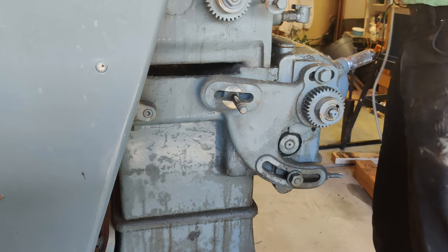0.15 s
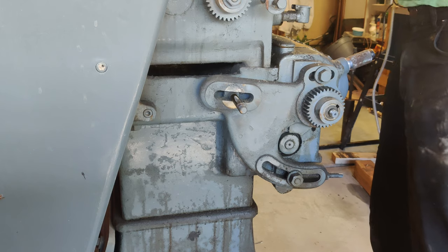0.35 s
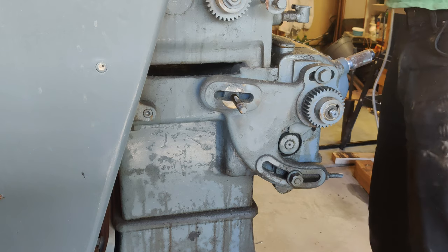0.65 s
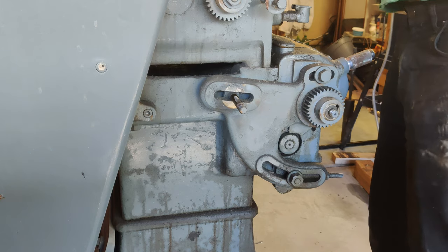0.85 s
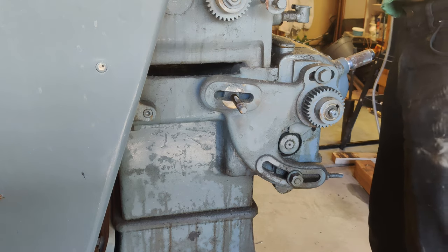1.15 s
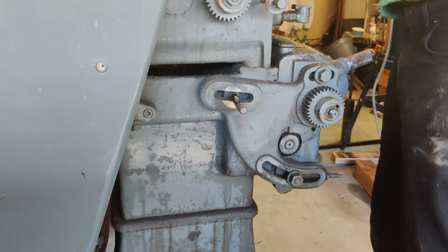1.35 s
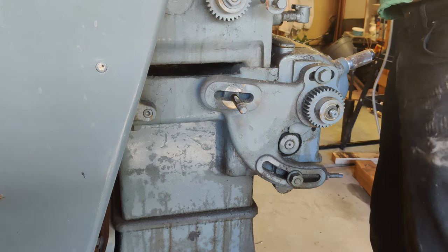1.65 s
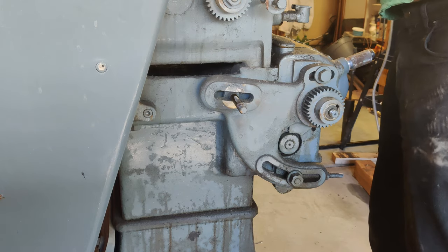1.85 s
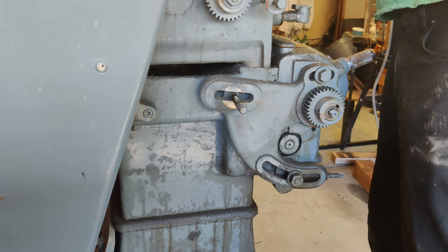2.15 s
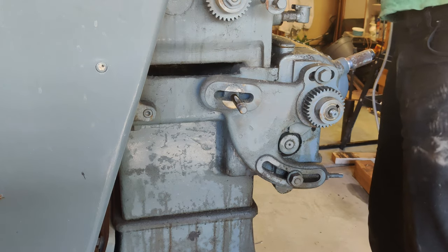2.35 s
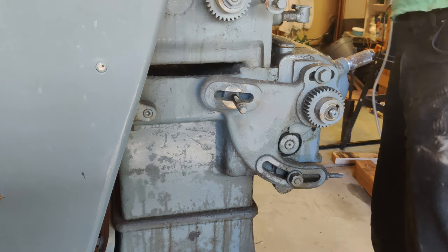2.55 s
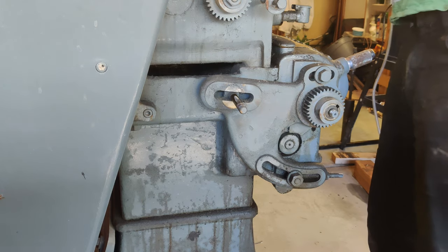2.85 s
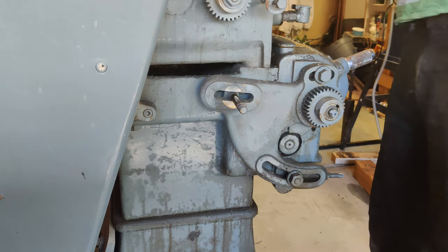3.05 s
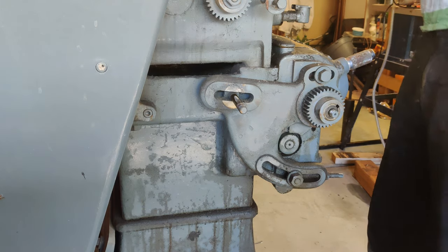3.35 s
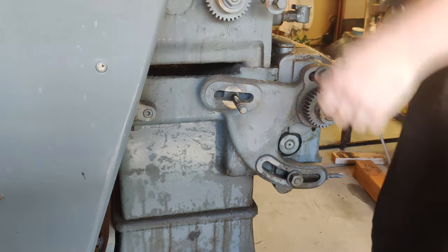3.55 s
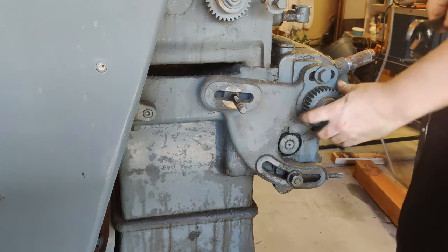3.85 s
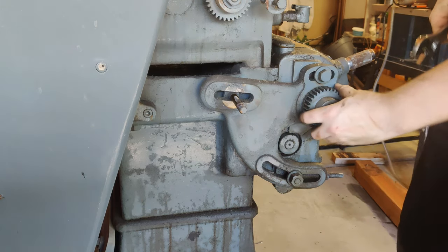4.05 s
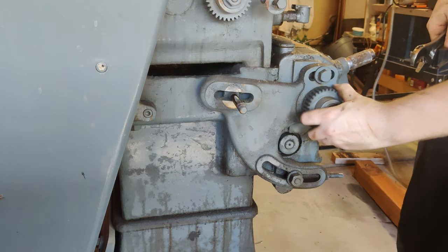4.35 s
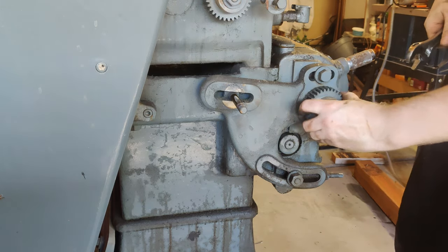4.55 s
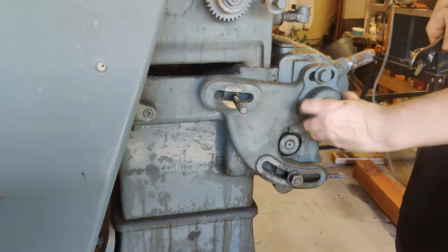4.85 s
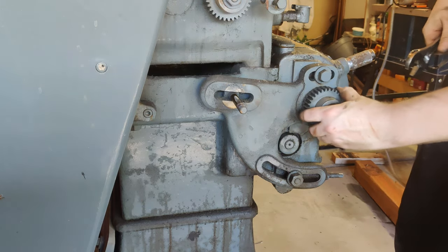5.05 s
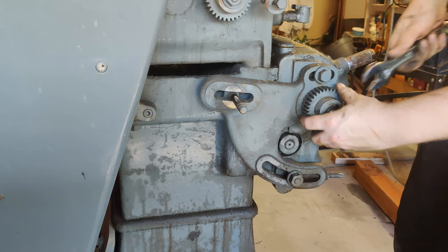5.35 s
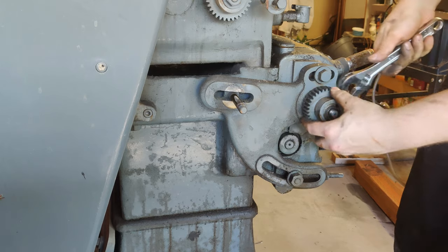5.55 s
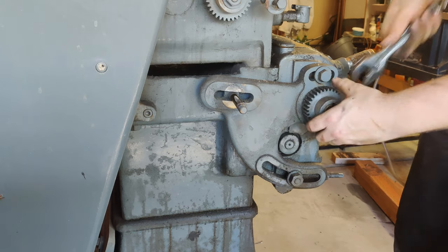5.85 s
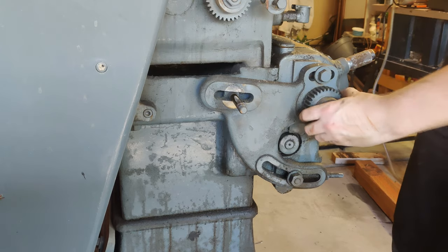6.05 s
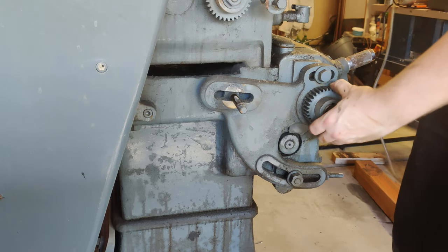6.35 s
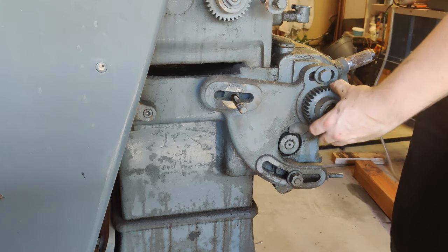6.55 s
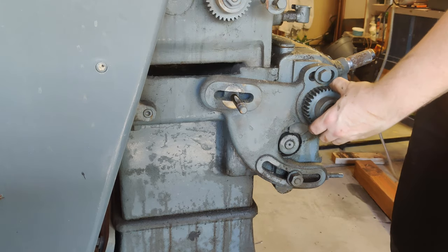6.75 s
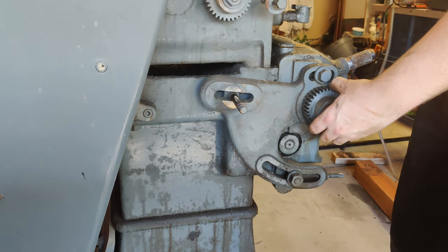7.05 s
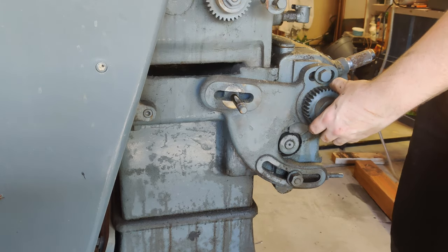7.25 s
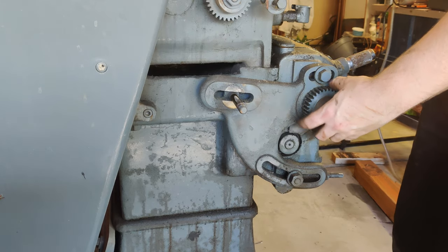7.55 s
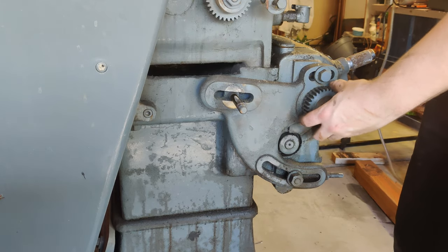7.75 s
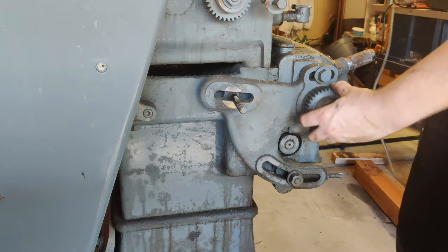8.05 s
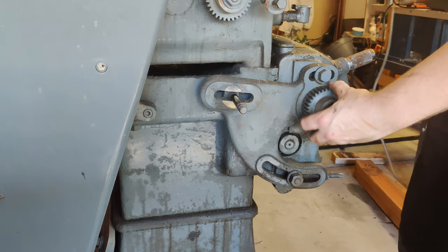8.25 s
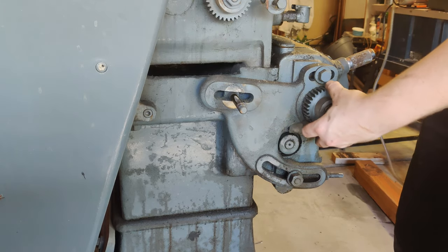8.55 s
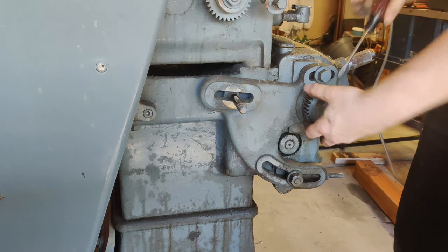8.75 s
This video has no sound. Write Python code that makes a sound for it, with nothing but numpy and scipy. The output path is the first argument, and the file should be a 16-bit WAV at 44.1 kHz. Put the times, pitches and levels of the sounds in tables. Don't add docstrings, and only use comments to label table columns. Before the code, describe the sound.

In a quiet hard-walled workshop, tools click off to the side, a gear is softly rocked, then a spanner rings loudly and metal clatters.

```python
import sys
import numpy as np
from scipy import signal
from scipy.fft import rfft, irfft
from scipy.io import wavfile
from scipy.ndimage import uniform_filter1d

SR = 44100
rng = np.random.default_rng(int(sys.argv[2]) if len(sys.argv) > 2 else 0)


def elevation(decibels):
    levels = np.asarray(decibels, float)
    return 10 ** (levels / 20)


def dump_mix(stems):
    frames = np.atleast_2d(stems).T
    limited = np.clip(frames, -1, 1)
    pcm = np.round(limited * 32767).astype(np.int16)
    wavfile.write(sys.argv[1], SR, pcm)


N = 391811

# [f/Hz,
# level/dB]
BACKGROUND_SWAY = [(0.0, -44.5), (0.05, -47.5), (0.34, -46.5), (0.57, -46.5), (2.27, -49.5), (3.04, -46),
                   (5.09, -44.5), (5.22, -47), (6.08, -47.5), (6.3, -48.5), (6.4, -43), (6.85, -46.5),
                   (7.0, -42.5), (7.42, -44.5), (7.49, -45.5), (8.16, -48), (8.83, -49), (8.88, -48)]
MACHINE_TONES = [(28.3, -4.5), (59.1, 1), (113, -21), (118.5, -17.5), (175, -24.5), (226, -20),
                 (257, -21.5)]
# [f/Hz, level/dB per Hz]
AIR_COLOUR = [(5.9, -26.5), (10, -5), (42, -8), (65, -4), (85, -15.5), (108, -22), (153, -13.5), (235, -13),
              (308, -22.5), (371, -18), (785, -29.5), (946, -26), (1140, -32), (6000, -46.5), (7800, -90),
              (13200, -120)]
AIR_DB = -54.5
HISS_COLOUR = [(3000, -71.5), (6000, -46), (9000, -46.5), (12000, -43.5), (15800, -39)]
# [f/Hz, level/dB]
PORT_LIKENESS = [(60, 1), (180, 0.95), (550, 0.45), (1650, 0.057), (4970, 0.064), (15000, -0.0)]
PORT_LEAN = [(60, 8), (180, -2), (550, 1), (1650, 2), (4970, -2.5), (15000, 3.5)]
# [t/s, level/dB]
WALL_DECAY = [(200, 0.82), (1000, 0.48), (2500, 0.65), (5000, 0.51), (8000, 0.46), (11000, 0.42),
              (15000, 0.15)]
NEAR_ECHOES = [(.006, -14), (.011, -13), (.017, -13), (.021, -16)]

CLOCK_BEATS = [0, 3, 13, 16, 19, 25, 27, 31, 39, 51, 55, 60, 67, 75, 94, 100, 104, 107]
STRAY_TICKS = [.2114, .7018, 1.1672, 1.5554, 1.6192, 1.6881, 1.8447, 4.0746, 4.6203, 5.8356, 6.212, 6.6204,
               7.5068, 7.621, 7.836, 8.676]
CLOCK_START_S, CLOCK_PERIOD_S = .0638, .08
CLOCK_DB, STRAY_DB, TICK_SPREAD_DB = -65, -64, 1.8

# [peak t/s, rise t/s, fall t/s, level/dB, brightness/dB per octave]
RUSTLE_STROKES = [
    (3.33, 0.005, 0.051, -65, 12),
    (3.406, 0.05, 0.039, -58.5, 3),
    (3.556, 0.7, .2, -66, 1.7),
    (3.828, 0.21, 0.11, -55.5, 6),
    (4.218, .18, 0.22, -72.5, -0.3),
    (4.7, .6, .6, -82.5, -1.5),
    (5.3, 0.03, .15, -87, -5),
    (8.135, .02, .012, -71, -1),
    (8.35, .25, 0.78, -77.5, -2.5),
]
# [f/Hz, level/dB per Hz]
RUSTLE_COLOUR = [(300, -2.5), (1000, -11), (3000, -16), (7000, -24.5), (11000, -36), (13500, -35),
                 (16000, -45)]
RUSTLE_PATCH_DB, STROKE_FADE_DB = 1.2, 20

# [t/s, peak level/dB, hardness/dB per octave, ring level/dB]
KNOCK_BLOWS = [
    (.5615, -28.5, -8.5, 1.4),
]
BENCH_BLOWS = [
    (0.853, -37.5, 0.3, -28),
]
LEVER_BLOWS = [
    (1.682, -42, 1.2, 6.6),
    (1.805, -50, 0.54, 8.1),
]
TOOL_BLOWS = [
    (2.61, -33.5, -2.5, -4),
    (2.832, -35.5, -5, -1.5),
    (2.959, -26, -2.5, -45),
]
LATCH_BLOWS = [
    (2.896, -32, 2.8, 1.9),
    (2.959, -30, 6.6, 0.68),
]
SLEEVE_SNAPS = [
    (3.328, -53, .3, .3),
    (3.4, -39, 2.5, .3),
    (4.221, -44, .3, .3),
]
JAW_BLOWS = [
    (5.6595, -28.5, 3, 2.2),
    (5.708, -29.5, 1.9, 4),
]
PIN_BLOWS = [
    (8.85, -34.5, 0.32, -35),
]
THUMP_BLOWS = [
    (3.326, -43.5, .3, 2),
]
GEAR_BLOWS = [
    (4.365, -42, 2.7, -15.5),
    (4.509, -44, 3.9, -25),
    (4.645, -43, 0.92, -21),
    (4.786, -44.5, 1.3, -12),
    (4.818, -47.5, 1.1, -35),
    (4.927, -46, 1.5, -21),
    (5.296, -47.5, 1.1, -7),
    (5.661, -36.5, 2.5, -21),
    (6.179, -41, 0.48, -12),
    (8.323, -47.5, 1.6, -10.5),
]
GEAR_NUDGES = [
    (4.553, -44, -1, 1.6),
    (4.656, -42, -24, 2),
    (4.936, -39, -21, 1.9),
    (4.996, -57, 7, 3),
]
BRACKET_BLOWS = [
    (6.798, -19, -18, 3.3),
    (6.884, -18.5, -2.5, 2.3),
    (6.94, -8.5, 3.5, 1.6),
    (6.954, -12.5, 13, 0.79),
    (6.994, -8.5, 6, 4.5),
    (7.087, -11, -1.2, 2.6),
]
SPANNER_BLOWS = [
    (6.2565, -2.5, 0.42, -3.5),
]

# [f/Hz, level/dB, t60/s]
TOOL_MODES = [(378, -35, .1), (1350, -9, .01), (1550, -5, .012), (1720, 0, .014), (1900, -4, .012),
              (2200, -8, .01), (3450, -16, .02)]
LATCH_MODES = [(378, -23, .15), (760, -8, .04), (1090, 0, .035), (1300, -6, .03)]
LEVER_MODES = [(750, -3, .035), (1270, -1, .03), (1800, -2, .02)]
JAW_MODES = [(2650, -16, .03), (4720, 0, .015), (4780, -21, .09), (6500, -12, .015)]
THUMP_MODES = [(555, 0, 0.02)]
GEAR_MODES = [(290, -8, .1), (372, 0, .14), (387, -2, .14), (560, -7, .03), (880, -8, .05)]
# [level/dB, t60/s]
BRACKET_HZ = [375, 382, 655, 716, 751, 774, 931, 1104, 1143, 1230, 1265, 1300, 1613, 1861, 2363, 2701, 2727,
              3344, 3800, 4700]
BRACKET_RING = [(-16.5, 0.39), (-18, 0.21), (-14, 0.18), (-10, 0.13), (-8, 0.21), (-6.5, 0.079),
                (-11, 0.13), (0.5, 0.027), (-3, 0.15), (-39, 0.052), (8, 0.046), (-39.5, 0.028),
                (-11, 0.092), (-13, 0.26), (-2.5, 0.047), (-17.5, 0.17), (-16.5, 0.18), (-8, 0.045),
                (-10, 0.085), (-3, 0.052)]
SPANNER_HZ = [1860, 2550, 2740, 4280, 4700, 4745, 5900, 10400, 11050, 14000, 14500, 14800, 15500]
SPANNER_RING = [(-15.5, .06), (-22, .02), (-12.5, .04), (-19.5, .02), (2.6, 0.05), (-24, 0.17),
                (-11, 0.013), (-10.5, 0.02), (-5.5, 0.012), (-14.5, .012), (-7, 0.033), (-2.5, 0.0097),
                (-11.5, .012)]

# [f/Hz, level/dB per Hz]
TOOL_CRACK = [(400, -37), (900, -54), (1300, -12.5), (1800, -4.5), (2500, -17), (4500, -16), (9000, -21),
              (16000, -29.5)]
BENCH_CRACK = [(600, -18.5), (1100, -13), (1500, -0.5), (2300, -13.5), (4500, -10), (9000, -22),
               (16000, -17)]
LATCH_CRACK = [(300, -25), (700, 4), (1100, -5), (1500, 0.5), (3000, -17.5), (8000, -22), (16000, -61)]
JAW_CRACK = [(1000, -19.5), (2500, -10.5), (3600, -0.5), (4700, -8), (6500, -9), (8500, -28), (16000, -26)]
SNAP_CRACK = [(1000, -8), (4000, 6.5), (8000, -5), (14000, -1), (16000, -11)]
GEAR_CRACK = [(150, -23.5), (300, 4.5), (600, 2), (1000, -0.5), (1600, -11), (2500, -23), (5000, -42.5)]
BRACKET_CRACK = [(180, -104), (300, -33), (372, -46), (519, -16), (747, -20.5), (2090, -11.5),
                 (4790, -14.5), (5940, -22), (14500, -43), (15800, -56)]
SPANNER_CRACK = [(240, -38), (500, -27), (900, -11), (1500, -14.5), (2690, -11), (4690, -18.5), (5640, -12),
                 (10600, -15), (12900, -23), (14400, -12.5), (15800, -22.5)]


def evened(x):
    return x / np.sqrt(np.mean(x ** 2) + 1e-20)


def read(points, hz):
    f, value = np.transpose(points)
    return np.interp(np.log(hz + 1), np.log(f + 1), value)


def add(mix, s, sound):
    part = mix[..., round(s * SR):][..., :sound.shape[-1]]
    part += sound[..., :part.shape[-1]]


def causal(db):
    log_gain = np.log(elevation(np.concatenate([db, db[-2:0:-1]])))
    return np.fft.ifft(np.exp(log_gain - 1j * signal.hilbert(log_gain).imag)).real[:len(db)]


def noise_grid():
    return np.fft.rfftfreq(1024, 1 / SR)[:, None], np.arange(N // 256 + 5) * 256 / SR


def noise(colour_db, same, patch_db):
    a, b, c, d, patches = rng.standard_normal((N // 256 + 5, 513, 5)).T
    patches = uniform_filter1d(patches, 12, 0)
    patches = evened(uniform_filter1d(patches, 14, 1))
    left = a + 1j * b
    right = same * left + np.sqrt(1 - same ** 2) * (c + 1j * d)
    z = np.array([left, right]) * elevation(colour_db + patch_db * patches)
    return signal.istft(z, nperseg=1024, noverlap=768)[1][:, :N]


def background_db(t):
    s, db = np.transpose(BACKGROUND_SWAY)
    return np.interp(t, s, db)


def air():
    hz, t = noise_grid()
    swell_db = (background_db(t) + 48.0) * (0.74 + 0.18 / (1 + hz / 400))
    lean_db = read(PORT_LEAN, hz) * np.array([.5, -.5])[:, None, None]
    both_db = 10 * np.log10(elevation(read(AIR_COLOUR, hz)) ** 2 + elevation(read(HISS_COLOUR, hz)) ** 2)
    same = np.clip(read(PORT_LIKENESS, hz), -1, 1)
    return elevation(AIR_DB) * evened(noise(both_db + swell_db + lean_db, same, patch_db=-0.04))


def hum():
    t, out = np.arange(N) / SR, np.zeros(N)
    knots = np.linspace(0, t[-1], 60)
    for hz, db in MACHINE_TONES:
        drift, waver = (np.interp(t, knots, w) for w in rng.standard_normal((2, 60)))
        depth = (hz > 80) + .2
        phase = 2 * np.pi * (hz * t + rng.random()) + .5 * depth * drift
        out += elevation(db) * elevation(2 * depth * waver) * np.sin(phase)
    return np.sqrt(2) * out * elevation(background_db(t) + np.array([[1.4], [-1.6]]))


def walls(x):
    taps = np.zeros((2, SR))
    at = np.arange(150, SR - 20, 20) + rng.integers(0, 20, (2, (SR - 151) // 20))
    np.put_along_axis(taps, at, rng.choice([-1., 1.], at.shape), 1)
    hz, t, z = signal.stft(taps, SR, nperseg=256)
    same = np.clip(read(PORT_LIKENESS, hz), -1, 1)[:, None]
    z = np.array([z[0], same * z[0] + np.sqrt(1 - same ** 2) * z[1]])
    decay = elevation(-60 * t / read(WALL_DECAY, hz)[:, None])
    z *= decay * (1 + 0.08 * np.exp(-t / 0.017))
    tail = signal.istft(z, SR, nperseg=256)[1]
    tail /= np.linalg.norm(tail[0])
    for (s, db), skew in zip(NEAR_ECHOES, rng.integers(-8, 9, len(NEAR_ECHOES))):
        tail[[0, 1], [round(s * SR) + skew, round(s * SR)]] += elevation(db)
    return signal.fftconvolve(x[None], tail, axes=1)[:, :N]


def ticks():
    out, t = np.zeros(N), np.arange(200) / SR
    rows = [(CLOCK_START_S + CLOCK_PERIOD_S * k, CLOCK_DB) for k in CLOCK_BEATS]
    rows += [(s, STRAY_DB) for s in STRAY_TICKS]
    for (s, db), (pitch, size) in zip(rows, rng.standard_normal((len(rows), 2))):
        swell = t / 0.0005 * np.exp(1 - t / 0.00053)
        tone = np.sin(2 * np.pi * (6200 + 250 * pitch) * t)
        add(out, s, elevation(db + TICK_SPREAD_DB * size) * swell * tone)
    return out * elevation([[1.5], [-1.5]])


def rustle():
    hz, t = noise_grid()
    power = 1e-14
    for s, rise, fall, db, bright in RUSTLE_STROKES:
        level_db = db - STROKE_FADE_DB * np.maximum((s - t) / rise, (t - s) / fall)
        power = power + elevation(level_db + bright * np.log2((hz + 50) / 5000)) ** 2
    colour_db = read(RUSTLE_COLOUR, hz) + 10 * np.log10(power)
    return elevation(3.0) * noise(colour_db, 0.08, patch_db=RUSTLE_PATCH_DB)


def blows(rows, modes, crack, contact_s, knee_hz, lag, pan_db, room_db):
    direct, feed = np.zeros((2, N)), np.zeros(N)
    t, hz = np.arange(SR // 2) / SR, np.fft.rfftfreq(4096, 1 / SR)
    touch_t = t[:512]
    for s, peak_db, hard, ring_db in rows:
        burst = rfft(rng.standard_normal(512) * touch_t * np.exp(-touch_t / contact_s))
        burst = irfft(burst / abs(burst) ** .8)
        burst *= np.exp(-touch_t / (3 * contact_s))
        crack_db = read(crack, hz) + hard * np.log2(1 + (hz / knee_hz) ** 2) / 2
        snap = np.convolve(burst, causal(crack_db))
        ring = np.zeros(len(t))
        onset = 1 - np.exp(-(t / contact_s) ** 2)
        for (f, db, t60), chance in zip(modes, rng.standard_normal((len(modes), 2))):
            tilt_db = hard * np.log2(1 + (f / knee_hz) ** 2) / 2 + 0.67 * chance[0]
            phase = 2 * np.pi * f * (1 + .004 * chance[1]) * t
            ring += elevation(db + tilt_db - 60 * t / t60) * np.sin(phase) * onset
        sound = elevation(ring_db) * ring / (abs(ring).max() + 1e-9)
        add(sound, 0, snap / abs(snap).max())
        sound *= elevation(peak_db) / abs(sound).max()
        touch = s - contact_s
        add(direct[0], touch + lag / SR, sound * elevation(pan_db / 2))
        add(direct[1], touch, sound * elevation(-pan_db / 2))
        add(feed, touch, sound * elevation(room_db))
    return np.vstack([direct, feed])


def side_tools():
    out = blows(TOOL_BLOWS, TOOL_MODES, TOOL_CRACK,
                contact_s=0.0019, knee_hz=2500, lag=4, pan_db=-1, room_db=0.6)
    out += blows(LATCH_BLOWS, LATCH_MODES, LATCH_CRACK,
                 contact_s=0.001366, knee_hz=2000, lag=3.4, pan_db=.7, room_db=-3.0)
    out += blows(KNOCK_BLOWS, TOOL_MODES[1:], TOOL_CRACK,
                 contact_s=0.00125, knee_hz=2520, lag=4, pan_db=1, room_db=1.5)
    out += blows(BENCH_BLOWS, TOOL_MODES[1:], BENCH_CRACK,
                 contact_s=0.0012, knee_hz=2480, lag=5.5, pan_db=-3.0, room_db=4.0)
    out += blows(LEVER_BLOWS, LEVER_MODES, LATCH_CRACK,
                 contact_s=0.0018, knee_hz=1190, lag=3, pan_db=.4, room_db=1.0)
    return out


def sleeve_snaps():
    return blows(SLEEVE_SNAPS, [], SNAP_CRACK,
                 contact_s=0.00034, knee_hz=3000, lag=7.7, pan_db=-9.0, room_db=-5)


def jaw_and_pin():
    out = blows(JAW_BLOWS, JAW_MODES, JAW_CRACK,
                contact_s=0.00008, knee_hz=3060, lag=1.5, pan_db=-3.0, room_db=-11.5)
    out += blows(PIN_BLOWS, JAW_MODES, JAW_CRACK,
                 contact_s=0.00029, knee_hz=3060, lag=1.5, pan_db=-10, room_db=5.5)
    return out


def gear():
    out = blows(THUMP_BLOWS, THUMP_MODES, GEAR_CRACK,
                contact_s=0.0021, knee_hz=600, lag=4, pan_db=-3.0, room_db=-1.0)
    out += blows(GEAR_BLOWS, GEAR_MODES, GEAR_CRACK,
                 contact_s=.003, knee_hz=600, lag=1.8, pan_db=1.7, room_db=5.7)
    out += blows(GEAR_NUDGES, GEAR_MODES, GEAR_CRACK,
                 contact_s=0.00327, knee_hz=600, lag=4.5, pan_db=-1.0, room_db=2.0)
    return out


def bracket():
    modes = np.column_stack([BRACKET_HZ, BRACKET_RING])
    return blows(BRACKET_BLOWS, modes, BRACKET_CRACK,
                 contact_s=.002, knee_hz=3140, lag=4, pan_db=0.9, room_db=-3.5)


def spanner():
    modes = np.column_stack([SPANNER_HZ, SPANNER_RING])
    return blows(SPANNER_BLOWS, modes, SPANNER_CRACK,
                 contact_s=0.00044, knee_hz=2950, lag=4, pan_db=8.5, room_db=-1.5)


def scene():
    metal = side_tools() + sleeve_snaps() + jaw_and_pin() + gear() + bracket() + spanner()
    return metal[:2] + walls(metal[2]) + hum() + air() + rustle() + ticks()


def top_cut(x):
    return signal.sosfilt(signal.butter(12, 17070, fs=SR, output="sos"), x)


def record(dry):
    low_pass = signal.firwin(511, 15850, window=("kaiser", 7), fs=SR)
    limited = signal.oaconvolve(dry, low_pass[None], "same")
    leak_db = -42
    mix = limited + elevation(leak_db) * (dry - limited)
    return top_cut(mix)


dry = scene()
out = record(dry)
dump_mix(out)
```